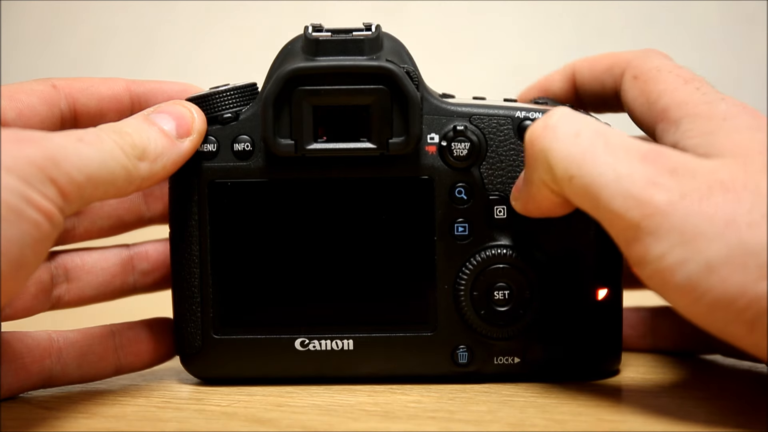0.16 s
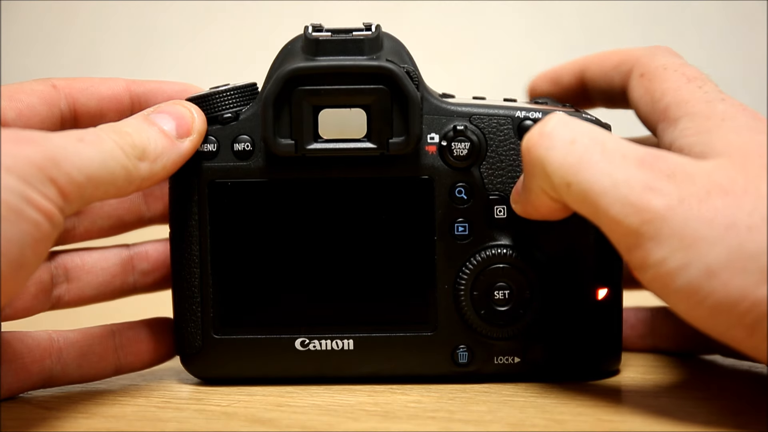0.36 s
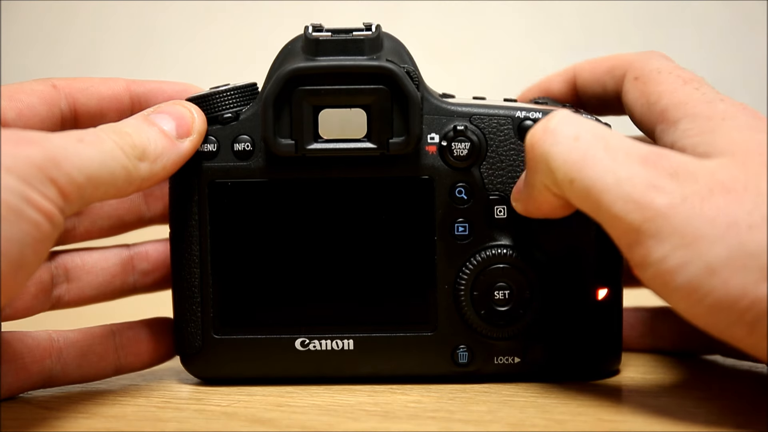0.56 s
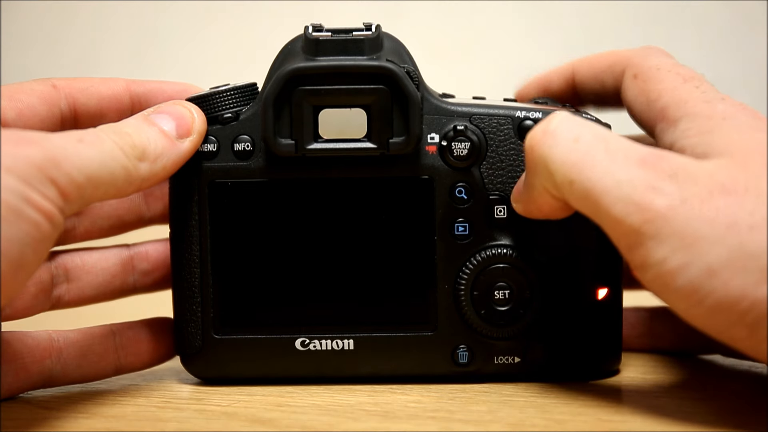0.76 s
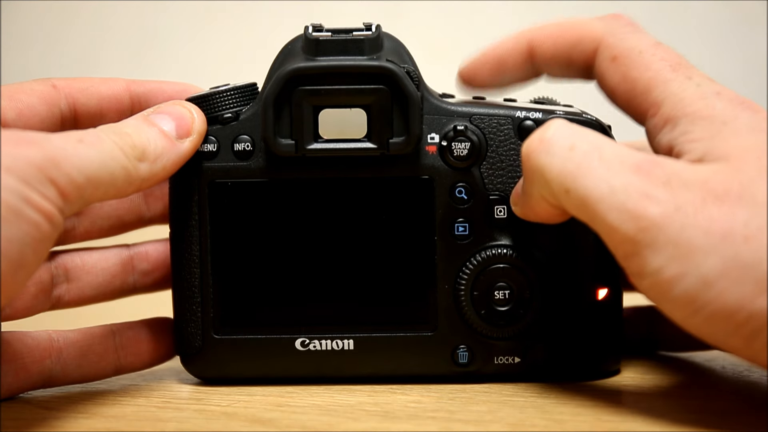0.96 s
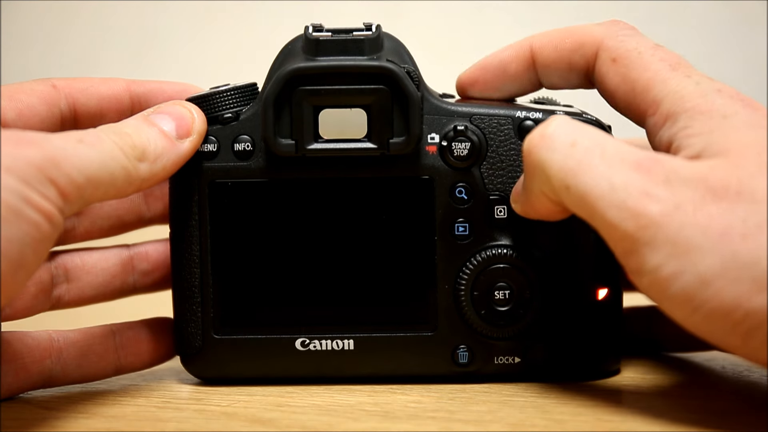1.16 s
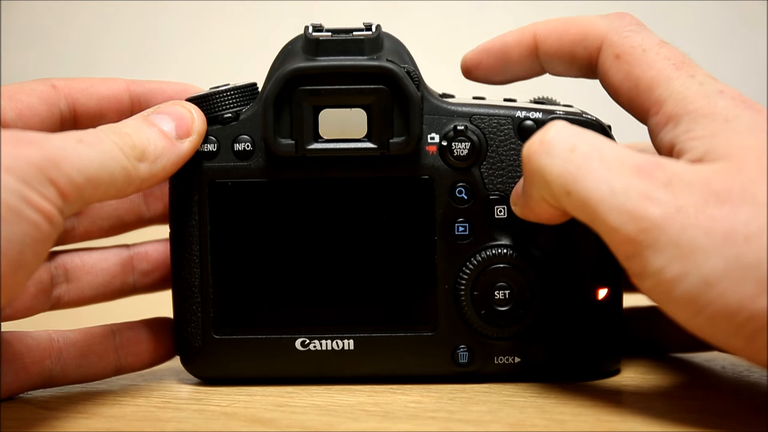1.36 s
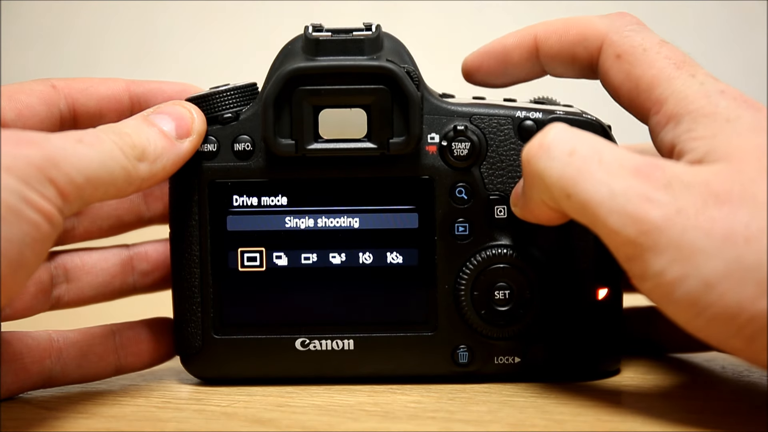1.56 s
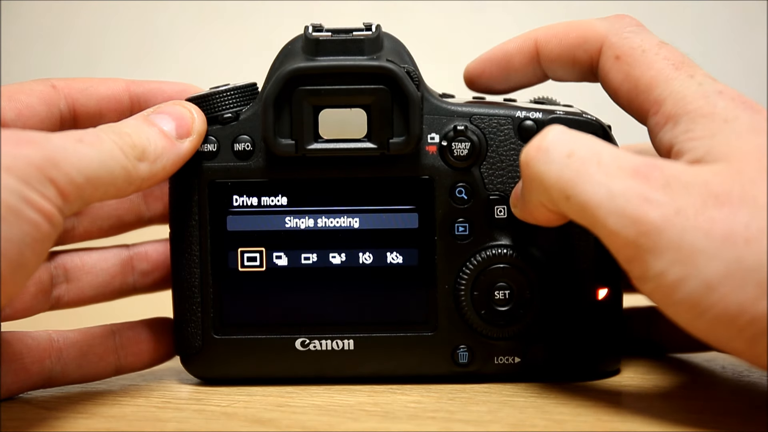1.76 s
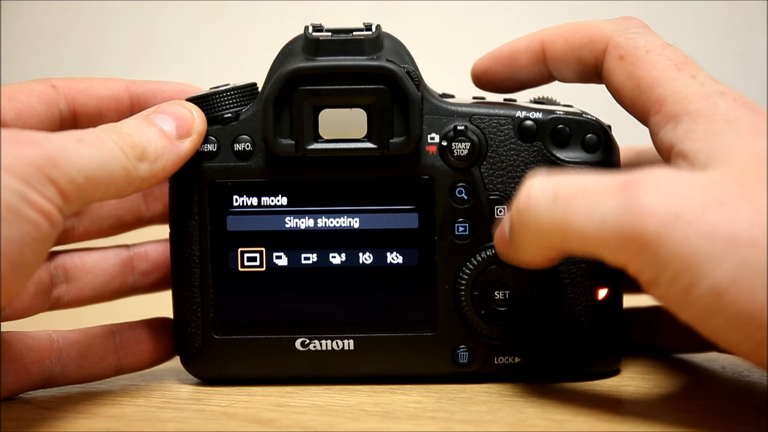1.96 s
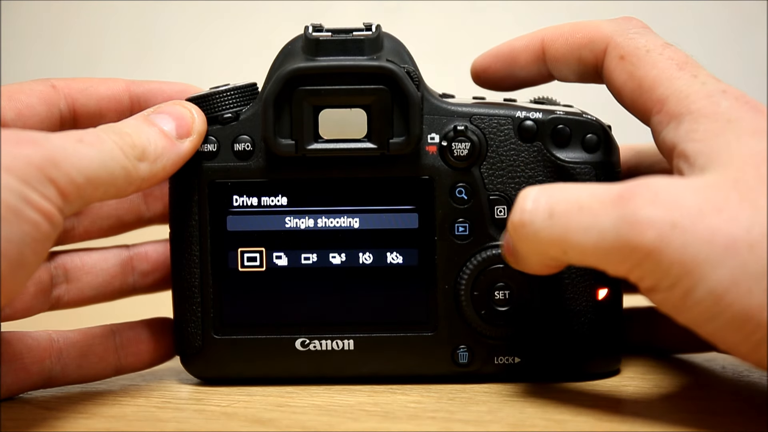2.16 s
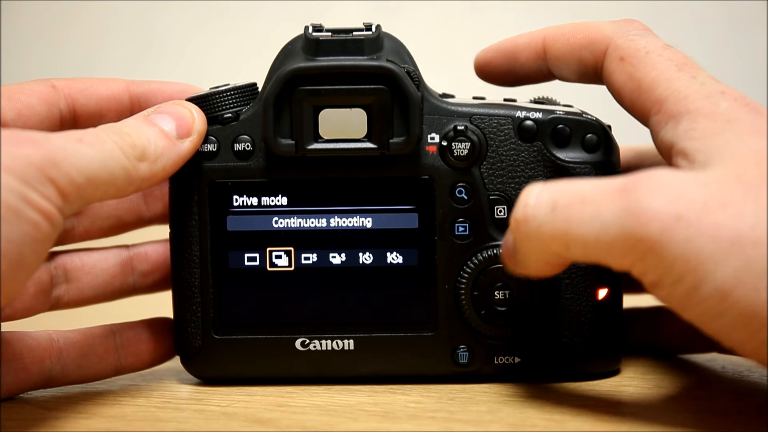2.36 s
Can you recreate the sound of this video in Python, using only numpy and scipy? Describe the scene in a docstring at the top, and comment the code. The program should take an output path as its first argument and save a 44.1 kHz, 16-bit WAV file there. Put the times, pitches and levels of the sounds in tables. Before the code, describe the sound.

A reflex camera shutter fires twice, close to the microphone, each a rapid clatter of mirror and curtain with a brief gear whirr and low table thump; then soft handling and small button clicks in a quiet room.

```python
"""A reflex camera, held on a wooden table in a quiet, faintly humming and hissing room, takes two pictures.
First a button clicks faintly, then each shot plays the same contacts: mirror up, curtains, mirror down.
Each contact is a push plus a burst of tiny impacts that makes its part ring; random tooth clicks make gears whirr.
During each shot the table thumps, and slowly swelling tones make the room boom after it.
Last, filtered noise rustles as the grip shifts, and ringing bursts and soft bumps mark fingers on buttons and dial."""
import sys
import numpy as np
from scipy import signal
from scipy.fft import rfft, irfft
from scipy.io import wavfile
from scipy.ndimage import uniform_filter1d

SR = 44100
rng = np.random.default_rng(int(sys.argv[2]) if len(sys.argv) > 2 else 0)


def dump(signal):
    """Clip the signal to [-1, 1] and save it as 16-bit WAV at the path in sys.argv[1]."""
    limited = np.clip(np.atleast_2d(signal).T, -1, 1)
    pcm = np.round(limited * 32767).astype(np.int16)
    wavfile.write(sys.argv[1], SR, pcm)


N = 110250  # length in samples: 2.5 seconds

# Steady hum and hiss of the room. Each row: frequency in Hz, relative level in dB per Hz.
FLOOR_SPECTRUM = [(15, -45), (25, -12.5), (108, -5.5), (200, -4), (285, -0.5), (344, -5.5), (373, -7.5),
                  (516, -12.5), (677, -6.5), (840, -16), (1100, -14), (1610, -18.5), (1790, -18),
                  (13200, -24.5), (16000, -31.5)]
FLOOR_DB = -56

# How long echoes last. Each row: frequency in Hz, time to fall by 60 dB in seconds.
ECHO_T60 = [(100, 3.5), (300, 0), (600, 0.53), (1200, 0.224), (4000, 0.26), (10000, 0.2)]
# How strong echoes are. Each row: frequency in Hz, level in dB.
ECHO_LEVEL = [(100, 8), (300, 3.5), (600, -9), (1200, -7.5), (4000, -11.5), (8000, -12.5), (14000, -14)]
ECHO_ONSET_S = 0.0035

# Standing waves of the room. Each row: frequency in Hz, level in dB, time to fall by 60 dB in seconds.
ROOM_MODES = [(123.2, -28, 0.31), (201.7, -47.5, 0.7), (319.6, -32, 0.55), (351, -28, 0.34)]
BOOM_AFTER_S, BOOM_RISE_S = 0.145, 0.059

# Rustle as the hand shifts its grip. Each row: time in seconds, level in dB.
GRIP_LEVEL = [(0.999, -53.5), (1.3, -64), (1.5, -60), (1.75, -65.5), (2.0, -73)]
# Lower and upper edge of the rustle in Hz.
GRIP_BAND_HZ = [276, 457]

# Jolts of the camera on the table. Each row: seconds after firing, level in dB, tilt in dB per octave.
JOLTS = [(0.002, -38, -0.5), (0.018, -25, -3.5), (0.051, -25.5, -1.5), (0.1335, -29.5, 1)]
# Tones of the table. Each row: frequency in Hz, level in dB, time to fall by 60 dB in seconds.
TABLE_MODES = [(89.7, -4.5, 0.17), (115.8, 3.5, 0.19), (197.3, -2, 0.21), (284.4, -1.5, 0.23),
               (359, -2.5, .22)]
JOLT_RISE_S, TILT_PIVOT_HZ = 0.02, 160
TABLE_LOW_HZ = 67  # the thumps are thinned out below this

# Soft bumps of the fingers on the body. Each row: start in seconds, level in dB.
BUMPS = [(1.385, -40.5), (2.082, -39)]
BUMP_HZ, BUMP_T60_S = 113, 0.19

# Button and dial clicks. Each row: start in seconds, level in dB, main ring in Hz, ring lift in dB,
# burst decay in seconds.
BUTTONS = [(0.16, -48, 5200, -4, 0.0026), (1.069, -48.5, 1310, 24.5, 0.0036), (1.380, -57, 1053, 11, .002),
           (2.076, -59, 1260, 28, 0.0022), (2.079, -61, 564, 30, 0.0046), (2.244, -49.5, 5430, 10, .004),
           (2.259, -53, 5470, 14, 0.0028), (2.276, -42, 5400, 5, 0.0058), (2.291, -59, 5500, 13, 0.0033),
           (2.372, -59, 2670, 25, 0.0036)]
# Tone colour of the clicks. Each row: frequency in Hz, level in dB.
BUTTON_COLOUR = [(200, 3), (1200, 2), (2800, 3), (3800, 1.5), (5500, 9), (9000, -3), (16000, -32)]
BUTTON_RING_WIDTH_HZ = 125

# Firings of the shutter. Each row: start in seconds, level in dB.
SHOTS = [(0.2155, 1), (0.6801, 0.87)]

# Loudness of the cocking gears. Each row: seconds after firing, level in dB.
GEAR_LEVEL = [(0.066, -52), (0.082, -27.5), (0.125, -26), (0.16, -28.5), (0.2, -48)]
# Tone colour of the gears. Each row: frequency in Hz, level in dB.
GEAR_COLOUR = [(60, -48), (200, -1), (600, -6), (1300, 1), (2500, -2.5), (4500, -3.5), (8000, -6.5),
               (12000, -21), (16000, -31)]
TEETH_PER_S, TOOTH_RING_S = 1250, 0.00049
TOOTH_JITTER, TOOTH_SPREAD_DB = 0.22, 2.5  # jitter is a share of the average gap between teeth

# Contacts of one shot. Each row: seconds after firing, part, chatter decay in seconds,
# then the knock, clack, crack and snap levels in dB, from low to high.
CONTACTS = [ (-0.0042, "mirror up", 0.0036, -15, -22.5, -53, -38),
            (0.0004, "mirror up", 0.0041, -9.5, -8.5, -8, -6.5),
            (0.0112, "mirror up", .007, -53, -22, -24, -16),
            (0.0210, "mirror stop", .004, -9, -14, -5.5, -11),
            (0.0236, "mirror stop", 0.00098, -32, -7.5, -10.5, -11.5),
            (0.0335, "mirror stop", 0.0062, -13, -36, -41, -28),
            (0.0512, "curtain", 0.0034, -17.5, -19, -13.5, -16.5),
            (0.0568, "curtain", .002, -14.5, -29, -21.5, -48),
            (0.0775, "curtain", 0.0033, -48, -13.5, -13.5, -15),
            (0.1048, "cam", .004, -15.5, -32, -17, -16), (0.1080, "cam", .005, -15, -15.5, -15.5, -13.5),
            (0.1190, "cam", .005, -43, -30.5, -26, -26),
            (0.1335, "mirror down", 0.0024, -4.5, -23, -15, -23),
            (0.1392, "mirror down", .005, -38, -13.5, -13.5, -14),
            (0.1455, "mirror down", 0.0044, -7, -14.5, -20, -22),
            (0.1551, "mirror down", 0.0062, -6.5, -26, -20.5, -23.5),
            (0.1740, "mirror down", 0.0081, -12, -23, -40, -53)]
# Edges in Hz between those four registers.
REGISTER_EDGES_HZ = [330, 780, 2250, 4400, 9800]
PUSH_BELOW_HZ = 830  # below this a contact is one clean push, above it chatter
SAME_BELOW_HZ = 2640  # below this both shots share the same chatter
SPLINTER_HZ, SPLINTER_DB = 12900, -29  # extra sharp treble of each contact
SHUTTER_DB = 0

# What each part rings with, by part name. Each row: frequency in Hz, width in Hz, lift in dB.
PART_RINGS = { "mirror up": [(400, 130, -20), (552, 20, 20), (820, 180, -3), (1061, 54, 14), (1888, 94, 11),
              (2440, 320, -11), (3176, 330, 13.5), (3800, 920, -13), (4970, 180, 6)],
              "mirror stop": [(606, 102, 13.5), (1043, 113, 5.5), (1470, 26, 2), (1880, 73, 10),
              (3120, 500, -5), (8560, 290, 11)], "curtain": [(432, 23.86, 18), (570, 20.3, 13.5),
              (970, 255, -9), (1310, 200, 10), (2120, 84, 4.5), (6160, 1200, 5)],
              "cam": [(1015.6, 120, 14.5), (1230, 60, 0), (1978, 42, 18), (3160, 370, 10.5), (7400, 340, 5),
              (10160, 700, 5.5)], "mirror down": [(361.7, 21, 8.5), (449, 28, 5), (576.5, 10.8, 17),
              (1190, 51, 9.5), (1336, 60, 8), (3310, 250, 10.5)]}
# What the camera housing rings with. Each row: frequency in Hz, width in Hz, lift in dB.
HOUSING_RINGS = [(790, 190, -2), (1276, 150, 2.5), (2220, 630, -3.5), (2714, 300, 4.5), (4296, 900, -7.5),
                 (6710, 750, 4), (11500, 3500, -2.5)]

CUTOFF_HZ = 16000  # top of the finished sound


def from_db(db):
    """Turn decibels into a factor for the wave's height."""
    return 10 ** (np.asarray(db) / 20)


def at_hz(points, hz):
    """Read a table between its rows, with equal steps for equal musical intervals."""
    table_hz, values = np.array(points).T
    return np.interp(np.log(np.maximum(hz, 1)), np.log(table_hz), values)


def rms_one(x):
    """Scale a sound so that its average power is one."""
    return x / np.sqrt(np.mean(x ** 2) + 1e-20)


def add(out, sound, s):
    """Mix a sound in, starting at a time in seconds."""
    i = max(int(s * SR), 0)
    out[..., i:i + sound.shape[-1]] += sound[..., :N - i]


def butter(x, hz, kind, order=2):
    """Keep the lows, the highs or a band with a smooth filter that never looks ahead."""
    safe_hz = np.clip(hz, 10, SR / 2 - 500)
    sos = signal.butter(order, safe_hz, kind, fs=SR, output="sos")
    return signal.sosfilt(sos, x + 1e-18)


def colour(x, spectrum):
    """Raise and lower each frequency as a table says, without shifting its phase."""
    hz = np.fft.rfftfreq(len(x), 1 / SR)
    return irfft(rfft(x) * from_db(at_hz(spectrum, hz)), len(x))


def resonate(x, hz, width_hz, lift_db):
    """Boost one frequency so that it rings, or dip it when the lift is negative."""
    a = np.pi * width_hz / SR
    g = from_db(lift_db)
    c = -2 * np.cos(2 * np.pi * hz / SR)
    return signal.lfilter([1 + a * g, c, 1 - a * g], [1 + a, c, 1 - a], x)


def ring(x, resonances):
    """Pass a sound through one resonance after another, as a solid body colours a blow."""
    for hz, width_hz, lift_db in resonances:
        x = resonate(x, hz, width_hz, lift_db)
    return x


def swell(hz, t60, rise_s):
    """Make a one-second tone that builds up and dies away, like a body set swinging."""
    t = np.arange(SR) / SR
    rise = 1 - np.exp(-t / rise_s)
    fall = 1000 ** (-t / t60)
    return np.sin(2 * np.pi * hz * t) * rise * fall


def push(size=2048):
    """Make one clean blow with the energy of one millisecond at full level."""
    return signal.unit_impulse(size) * np.sqrt(SR / 1000)


def chatter(decay_s, size=2048):
    """Make a dying noise burst of tiny impacts, with the energy of one millisecond at full level."""
    fade = np.exp(-np.arange(size) / SR / decay_s)
    burst = rng.standard_normal(size) * fade
    for _ in range(3):
        # even out the spectrum, then bring back the smooth fade
        burst = irfft(np.exp(1j * np.angle(rfft(burst))))
        power = uniform_filter1d(burst ** 2, size=96).clip(0)
        burst *= fade / np.sqrt(power + 1e-12)
    return burst * np.sqrt(SR / 1000 / np.sum(burst ** 2))


def room_floor():
    """Shape steady random noise into the hum and hiss of the quiet room."""
    return from_db(FLOOR_DB) * rms_one(colour(rng.standard_normal(N), FLOOR_SPECTRUM))


def room(x):
    """Echo a sound with a tail of fading noise bands, each with its own fade time and level."""
    t, tail = np.arange(SR) / SR, 0
    edges = np.geomspace(100, 17000, 21)  # 20 bands, in Hz
    for low, high in zip(edges, edges[1:]):
        hz = np.sqrt(low * high)
        onset = 1 - np.exp(-(t / ECHO_ONSET_S) ** 2)
        fade = 1000 ** (-t / at_hz(ECHO_T60, hz)) * onset
        band = butter(rng.standard_normal(SR), [low, high], "band", order=3) * fade
        # a wider band gets more energy
        band_gain = np.sqrt(2 * (high - low) / SR / np.sum(band ** 2))
        tail = tail + from_db(at_hz(ECHO_LEVEL, hz)) * band * band_gain
    return signal.fftconvolve(x, tail)[:N]


def boom():
    """Let the room's standing waves swell up and linger after each shot."""
    out = np.zeros(N)
    waves = sum(from_db(db) * swell(hz, t60, BOOM_RISE_S) for hz, db, t60 in ROOM_MODES)
    for s, db in SHOTS:
        add(out, from_db(db) * waves, s + BOOM_AFTER_S)
    return out


def grip():
    """Rub skin softly on the camera body after the shots, as a band of noise with a changing level."""
    level_db = np.interp(np.arange(N) / SR, *np.transpose(GRIP_LEVEL), left=-np.inf)
    rub = rms_one(butter(rng.standard_normal(N), GRIP_BAND_HZ, "band"))
    return from_db(level_db) * rub


def table():
    """Set off low swelling tones as the mirror and curtain jolt the table and the fingers bump the body."""
    out, thump = np.zeros(N), np.zeros(N)
    modes = [(hz, from_db(db) * swell(hz, t60, JOLT_RISE_S)) for hz, db, t60 in TABLE_MODES]
    for after, db, tilt_db in JOLTS:
        for hz, tone in modes:
            octaves = np.log2(hz / TILT_PIVOT_HZ)
            add(thump, from_db(db + tilt_db * octaves) * tone, after)
    for s, db in SHOTS:
        add(out, from_db(db) * thump, s)
    for s, db in BUMPS:
        add(out, from_db(db) * swell(BUMP_HZ, BUMP_T60_S, JOLT_RISE_S), s)
    return butter(out, TABLE_LOW_HZ, "high", order=3)


def buttons():
    """Click small plastic buttons and a dial, each a burst of impacts with one main ring."""
    out = np.zeros(N)
    for s, db, hz, ring_db, decay_s in BUTTONS:
        click = resonate(chatter(decay_s), hz, BUTTON_RING_WIDTH_HZ, ring_db)
        add(out, from_db(db) * click, s)
    return colour(out, BUTTON_COLOUR)


def gears():
    """Whirr with quick, uneven tooth clicks while the motor cocks the shutter."""
    out = np.zeros(N)
    after, level_db = np.transpose(GEAR_LEVEL)
    for s, db in SHOTS:
        gap_chance, force_chance = rng.standard_normal((400, 2)).T
        gaps = np.abs(1 + TOOTH_JITTER * gap_chance) / TEETH_PER_S
        t = after[0] + np.cumsum(gaps)
        tooth_db = db + np.interp(t, after, level_db) + TOOTH_SPREAD_DB * force_chance
        force = from_db(tooth_db) * (t < after[-1])  # no teeth after the last table row
        places = ((s + t) * SR).astype(int).clip(0, N - 1)
        out[places] += force * np.sqrt(SR / TEETH_PER_S)
    tooth = chatter(TOOTH_RING_S)
    clicks = signal.fftconvolve(out, tooth / np.linalg.norm(tooth))[:N]
    return colour(clicks, GEAR_COLOUR)


def contacts(part):
    """Strike one part with a push plus chatter in four registers; only the treble differs between shots."""
    drive = np.zeros((4, N))  # one row per register
    for after, name, decay_s, *levels_db in CONTACTS:
        if name != part:
            continue
        blow = butter(push(), PUSH_BELOW_HZ, "low", order=3)
        middle = butter(chatter(decay_s), [PUSH_BELOW_HZ, SAME_BELOW_HZ], "band", order=3)
        for s, db in SHOTS:
            treble = butter(chatter(decay_s), SAME_BELOW_HZ, "high", order=3)
            gains = from_db(np.array(levels_db) + db)[:, None]
            add(drive, gains * (blow + middle + treble), s + after)
    edges = zip(REGISTER_EDGES_HZ, REGISTER_EDGES_HZ[1:])
    out = sum(butter(d, edge, "band", order=3) for d, edge in zip(drive, edges))
    splinter = butter(drive[-1], SPLINTER_HZ, "high", order=4)
    out = out + from_db(SPLINTER_DB) * splinter
    return from_db(SHUTTER_DB) * ring(out, PART_RINGS[part])


def scene():
    """Add the ringing camera and its echoes to the table, the boom, the rustle and the quiet floor."""
    floor = room_floor()
    mechanism = sum(contacts(part) for part in PART_RINGS) + gears()
    camera = ring(mechanism, HOUSING_RINGS) + buttons()
    return (camera + room(camera) + table() + boom() + grip() + floor)[None]


def record(dry):
    """Round off the highest peaks, then steeply cut the top treble."""
    top = 0.7  # height that the rounded peaks approach
    rounded = top * np.tanh(dry / top)
    sos = signal.ellip(10, 0.1, 80, CUTOFF_HZ, fs=SR, output="sos")
    return signal.sosfilt(sos, rounded)


dry = scene()
out = record(dry)
dump(out)
```